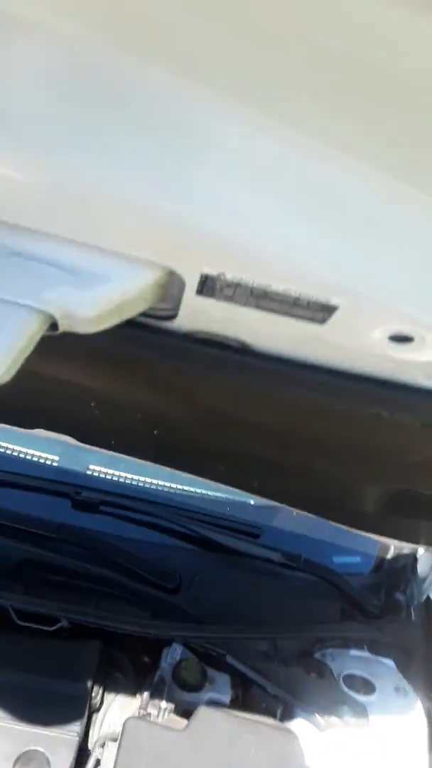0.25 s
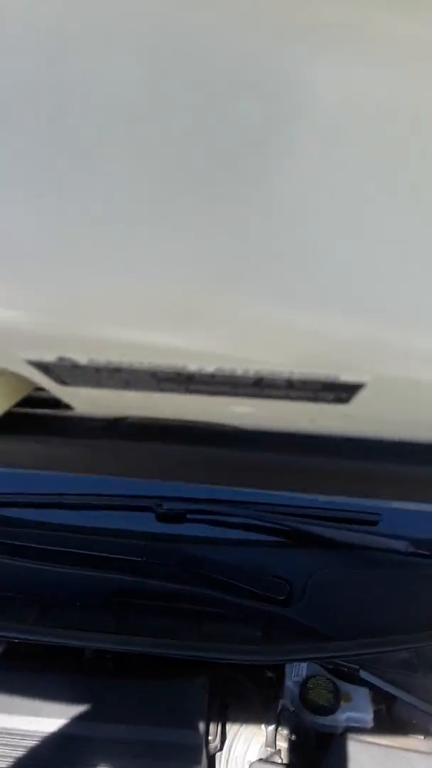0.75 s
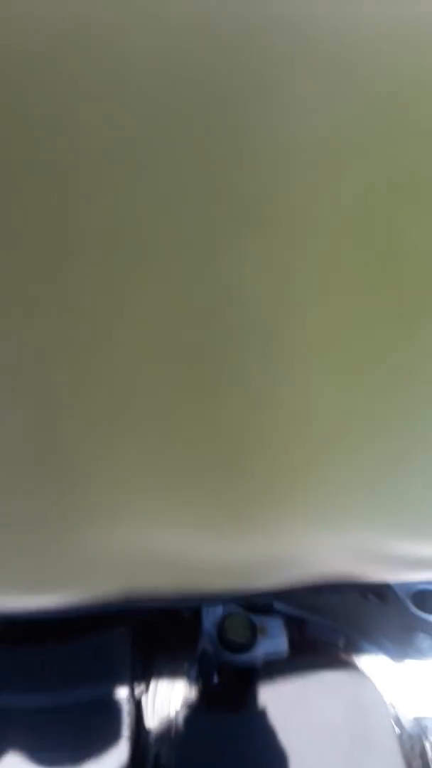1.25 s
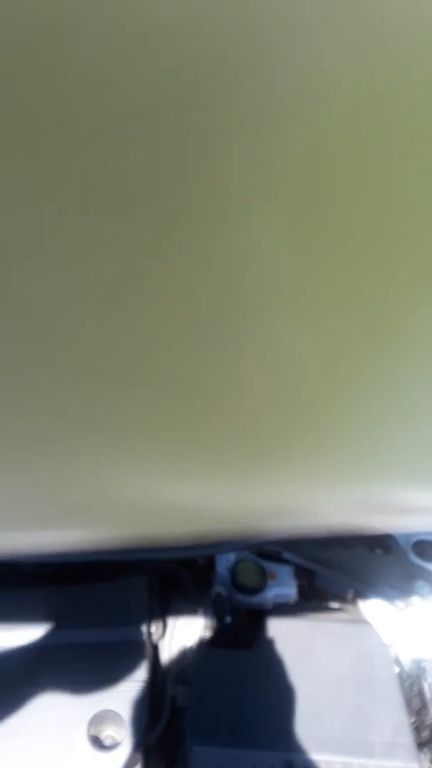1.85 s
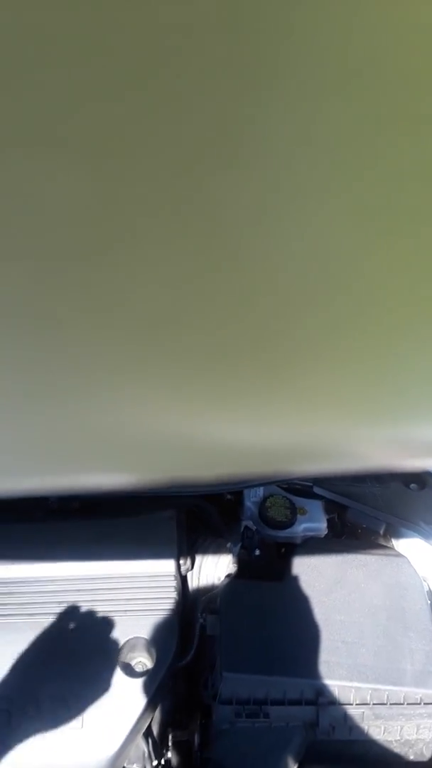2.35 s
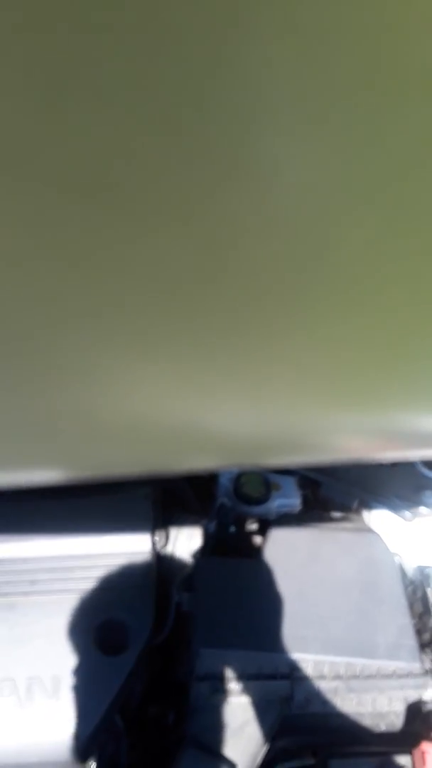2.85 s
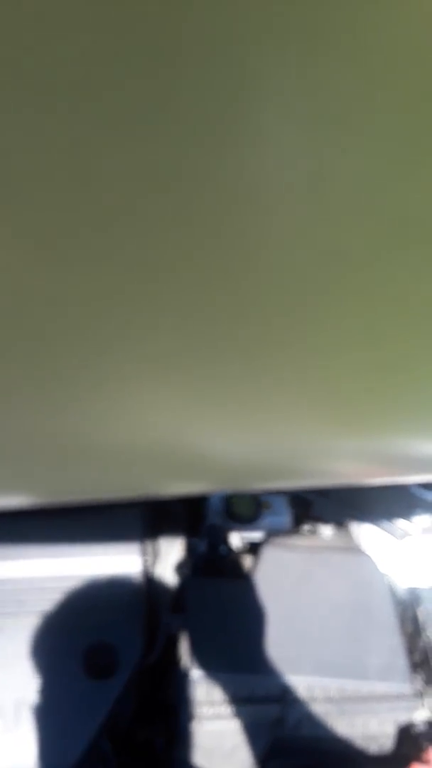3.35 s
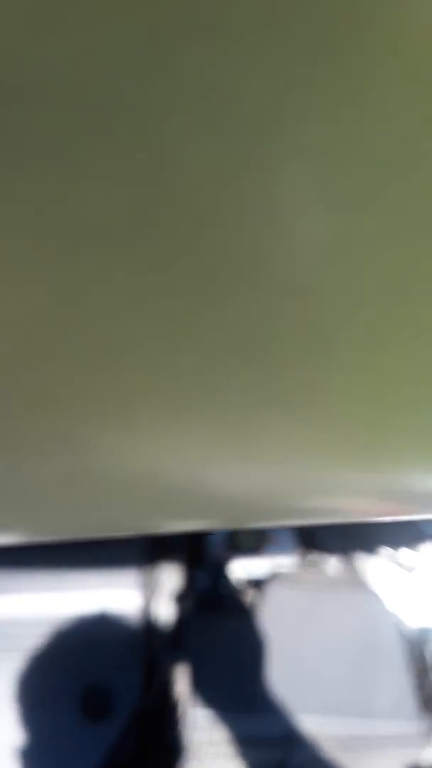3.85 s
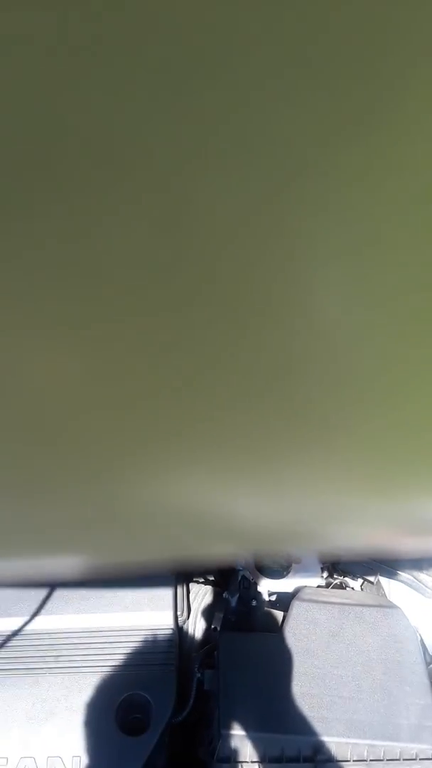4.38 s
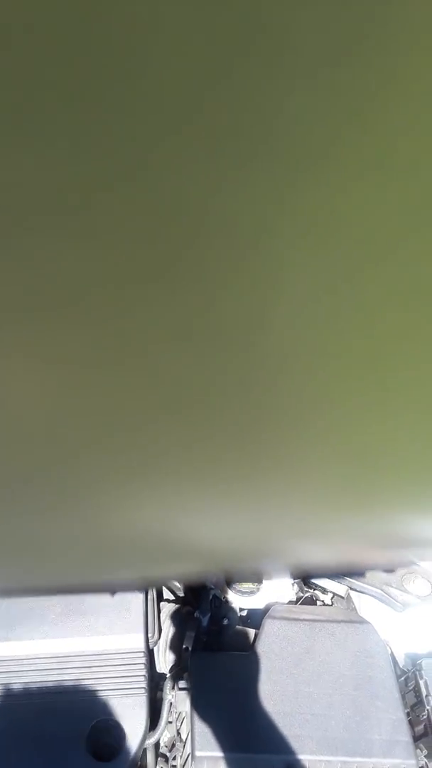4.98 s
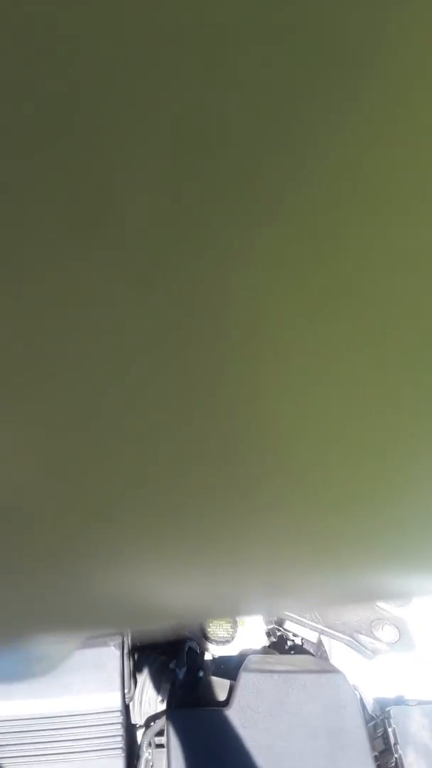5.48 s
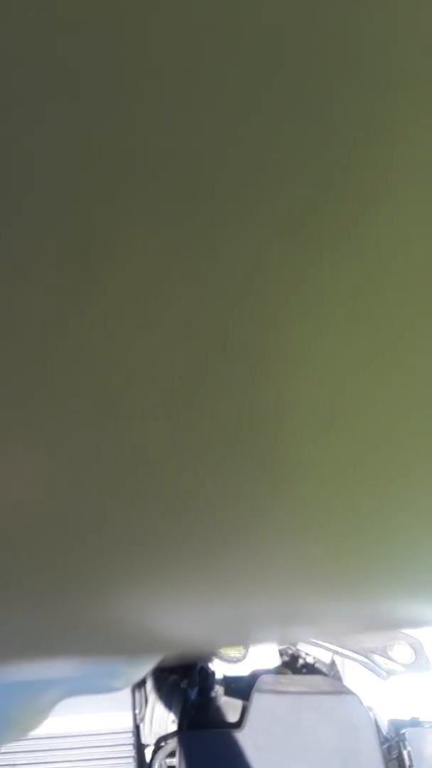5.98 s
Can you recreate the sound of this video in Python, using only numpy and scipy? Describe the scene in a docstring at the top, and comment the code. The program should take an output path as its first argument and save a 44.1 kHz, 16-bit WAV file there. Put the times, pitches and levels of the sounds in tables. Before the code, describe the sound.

A car engine idles under an open hood while a metal prop rod snaps loose, clanks and rattles into place.

```python
"""A four-cylinder engine idles: belts and fan rush, firings chuff, injectors tick, the alternator whines. A
hand bumps the phone on the right at the start, and the engine opens out as the hood lifts. At 1 s steel clanks
in a heavy blow and the hood's bending modes boom; then the whole sound sinks for a second and comes back. The
rod clanks at 3.7 s, rings and rattles into its slot at 4.5 s, and the hood settles with a few lighter knocks.
Near the end the hand bumps the phone again."""
import sys
import numpy as np
from scipy import signal
from scipy.fft import rfft, irfft, next_fast_len
from scipy.io import wavfile

SR = 44100
rng = np.random.default_rng(int(sys.argv[2]) if len(sys.argv) > 2 else 0)


def digitize_waveform(pressure):
    """Quantize a signal to 16-bit integers and store it at the path in sys.argv[1].

    Rows of a 2-D input are taken as channels; values are limited to [-1, 1].
    """
    field = np.atleast_2d(pressure).T
    bounded = np.clip(field, -1, 1)
    quanta = np.round(bounded * 32767).astype(np.int16)
    wavfile.write(sys.argv[1], SR, quanta)


N = 274302
T = np.arange(N) / SR
IMPACT_T = T[:SR // 2]  # time since a blow [s]
SIZE = next_fast_len(N, True)
HZ = np.fft.rfftfreq(SIZE, 1 / SR)
FIRING_HZ = 23.55
ANTIPHASE = np.array([[1], [-1]])


def undb(db):
    """Decibels to amplitude ratio."""
    return 10 ** (np.asarray(db) / 20)


def pan(db):
    """Stereo gains for a balance: the level difference, left minus right."""
    return undb(np.array([[.5], [-.5]]) * db)


def curves(table):
    """Linear interpolation of a time table at every sample."""
    times, *columns = np.transpose(table)
    return [np.interp(T, times, c) for c in columns]


def spectra(table):
    """Log-frequency interpolation of a table at every bin."""
    hz, *columns = np.transpose(table)
    return [np.interp(np.log(HZ + 1), np.log(hz), c) for c in columns]


def unit(x):
    """Normalisation to rms 1."""
    return x / np.sqrt(np.mean(x ** 2))


def noise(gain):
    """Spectral shaping: noise of rms 1 from a gain at each bin."""
    return irfft(rfft(rng.standard_normal(SIZE)) * unit(gain), SIZE)[:N]


def stereo_noise(gain):
    """Incoherence: the same spectrum, independent on each side."""
    return np.array([noise(gain), noise(gain)])


def walk(rate):
    """Random modulation of spread about 1, with up to rate swings a second."""
    knots = np.arange(0, T[-1] + 1, .5 / rate)
    return np.interp(T, knots, rng.standard_normal(N)[:len(knots)]) * np.sqrt(3 / 2)


def resonance(hz, width):
    """Lorentzian gain of one resonance at each bin."""
    return 1 / (1 + ((HZ - hz) / (width / 2)) ** 2)


def fade(t60):
    """Exponential damping, 60 dB down at t60."""
    return np.exp(-np.log(1000) * IMPACT_T / t60)


def excitation(hz, centre_hz, octaves):
    """Selective excitation: a blow drives the modes near its centre hardest."""
    return np.exp(-.5 * (np.log2(hz / centre_hz) / octaves) ** 2)


def add(out, at, sound):
    """Superposition of a stereo sound from a given time."""
    i = max(int(at * SR), 0)
    out[:, i:i + sound.shape[1]] += sound[:, :N - i]


def strokes(offset, rise, scatter_db):
    """Pulse train of uneven strength at the firing rate; offset and rise are shares of a cycle."""
    cycles = FIRING_HZ * T - offset + 1
    strength = undb(scatter_db * rng.uniform(-1, 1, int(FIRING_HZ * T[-1]) + 4))
    age = cycles % 1 / rise
    return unit(strength[cycles.astype(int)] * age * np.exp(-age))


# spectrum of belts and fan: (frequency [Hz], relative density [dB])
RUSH_SPECTRUM = [(25, -33), (45, -13.5), (80, -11), (170, -2), (420, -2), (720, -2.5), (1000, -8.5),
                 (1700, -14.5), (2300, -9), (2800, -19), (4400, -19.5), (5400, -27.5), (7400, -28.5),
                 (9200, -39), (11000, -33), (16000, -35)]
# the bay at the two microphone ports: (frequency [Hz], side minus mid [dB], balance [dB])
BAY_AT_PORTS = [(60, -16, 2), (250, -42, -0.5), (566, -7, 3.5), (800, -13, 10.5), (1030, 0.5, 4),
                (1440, 6.5, -1.5), (2300, -3, 0.5), (3360, 2.5, 2), (4600, 0.5, 2), (12000, 0.5, 0.5)]


def belts_and_fan(treble_db, body_flicker_db=0.56, hiss_flicker_db=0.4):
    """Broadband noise, partly coherent between the ports; the hood shades treble more than bass."""
    colour = undb(spectra(RUSH_SPECTRUM)[0])
    side_db, balance_db = spectra(BAY_AT_PORTS)
    mid, side = rfft(rng.standard_normal((2, SIZE))) * unit(colour)
    ports = (mid + side * undb(side_db) * ANTIPHASE) * pan(balance_db)
    upper = HZ ** 4 / (HZ ** 4 + 4200 ** 4)  # crossover at 4200 Hz
    body, hiss = (irfft(ports * share, SIZE)[:, :N] for share in (1 - upper, upper))
    return body * undb(body_flicker_db * walk(14)) + hiss * undb(treble_db + hiss_flicker_db * walk(33))


# air modes under the hood: (frequency [Hz], width [Hz], relative level [dB])
CAVITY_MODES = [(542, 76, -1), (617.6, 41, 0), (673.7, 32, -1)]


def firing_chuff(steady=1.25):
    """Cavity resonance: each firing rings the air under the hood, above a steady part."""
    cavity = sum(undb(db) * resonance(hz, width) for hz, width, db in CAVITY_MODES)
    return unit(noise(cavity) * (steady + strokes(offset=0.404, rise=0.11, scatter_db=2))) * pan(2.8)


def gap_ring():
    """A standing wave across the gap meets the two ports in opposite phase."""
    return noise(resonance(hz=1220, width=650)) * ANTIPHASE * pan(5.7)


def injectors():
    """Periodic impacts: one tick of high treble noise per firing."""
    return stereo_noise(resonance(hz=13900, width=11000)) * strokes(0.665, rise=0.05, scatter_db=2.5)


def valves():
    """Periodic impacts: a lower clatter at another point of the cycle."""
    return stereo_noise(resonance(hz=3150, width=2200)) * strokes(0.076, rise=0.04, scatter_db=2)


# colour of the engine through the gap: (time [s], hollow ring gain [dB], treble gain [dB])
GAP_COLOUR = [(0, -6, 0), (1, 0.5, 1.5), (2, -1, 2), (2.5, 4.5, -2.5), (2.95, -5, 2.6), (4.3, -5.5, 3.5),
              (4.7, 4.5, 2.6), (6.2, -0.5, 1.7)]


def engine(lift_s=0.4, fall_db_per_s=0.3873):
    """Acoustic shielding: the engine is muffled and lies to the right until the hood lifts."""
    lowered = np.exp(-T / lift_s)
    hollow_db, treble_db = curves(GAP_COLOUR)
    # the bay swells with the hollow ring and eases as the phone sinks below the hood's edge
    bay_db = -4 * lowered + 0.074 * hollow_db - fall_db_per_s * T
    rush = belts_and_fan(treble_db) * undb(-32)
    chuff = firing_chuff() * undb(-35 - 34 * lowered)
    hollow = gap_ring() * undb(-39 + hollow_db)
    ticking = injectors() * undb(-56.5 + treble_db) + valves() * undb(-48.5)
    return ((rush + ticking) * undb(bay_db) + chuff + hollow) * pan(-0.43 - 6.5 * lowered)


# partials of the whine: (harmonic number, relative level [dB])
WHINE_PARTIALS = [(1, -57), (2, -49), (3, -50.5), (6, -54.5), (7, -65.5), (9, -93), (10, -65), (11, -69),
                  (12, -60), (13, -65)]
# the whistling 4th harmonic, dip included: (time [s], relative level [dB], balance [dB])
WHISTLE_SWELL = [(0.0, -58, -15), (0.2, -42, -4), (0.35, -53, -5), (0.46, -42.5, -1), (0.75, -58.5, -23),
                 (0.98, -40.5, -11.5), (1.3, -62, 1), (1.6, -50.5, 10), (2.05, -62, 2), (2.6, -59.5, -8),
                 (3.1, -44, 0), (3.65, -52, 1.0), (4.15, -53.5, 8.0), (4.65, -44, -4.0), (5.02, -50.5, 7),
                 (5.25, -56, 8), (5.5, -49.0, 7), (6.2, -48, -3.0)]
# the 5th harmonic, dip included: (time [s], relative level [dB])
OVERTONE_SWELL = [(0.0, -58), (1.0, -61.5), (1.9, -74), (2.85, -54.5), (3.15, -63), (3.6, -52.5),
                  (4.9, -60), (5.8, -49.5), (6.2, -51)]


def alternator(whine_hz=1172.9, drift=0.000683, surge=0.002, flutter=0.3, fading_db=2.5):
    """Frequency modulation: a harmonic series surges with each firing and fades as the hood moves."""
    speed = 1 + drift * walk(14) + surge * np.sin(2 * np.pi * FIRING_HZ * T)
    phase = 2 * np.pi * whine_hz * np.cumsum(speed) / SR
    swell_db, pan_db = curves(WHISTLE_SWELL)
    whistles = undb(swell_db + 1) * pan(pan_db)
    overtone = undb(curves(OVERTONE_SWELL)[0] - 0.4)
    out, dipped = np.zeros((2, N)), dip()
    for port, whistle in zip(out, whistles):
        partials = [(4, whistle), (5, overtone)]
        for harmonic, db in WHINE_PARTIALS:
            partials.append((round(harmonic), dipped * undb(db - 4.5 + fading_db * walk(1.39))))
        for harmonic, gain in partials:
            stirred_air = 1 + flutter * walk(25)
            path_phase = walk(1.0)  # the path to each port changes slowly
            port += gain * stirred_air * np.sin(harmonic * phase + path_phase)
    return np.sqrt(2) * out


# bending modes of the hood, also used for the hand bumps: (frequency [Hz], relative level [dB], t60 [s])
PANEL_MODES = [(56, -27, .18), (85.2, -11, 0.27), (116.4, -1.5, 0.18), (140.7, -7, 0.19),
               (174.4, -4.5, 0.11), (224, -2.5, 0.15), (273, 1.5, 0.042), (290.6, -2.5, 0.2),
               (347, 3.5, 0.055), (411.4, -2.5, 0.097), (468, 2.5, 0.027), (529, -5, 0.14),
               (670, 6.5, 0.051), (835, 4.5, 0.059), (1030, 0, 0.066), (1366, -2.5, 0.13)]


def thump(centre_hz, push_s=0.00088, travel_s=0.0018, spread=0.74):
    """Modal vibration: a soft shove rings the low modes, a hard knock the high ones."""
    hz, db, t60 = np.transpose(PANEL_MODES)[:, :, None]
    weight = undb(db) * excitation(hz, centre_hz, octaves=0.66)
    # each bending wave takes its own path; short ones reach the two ports out of step
    lag = travel_s * rng.uniform(-1.156, 1, (len(hz), 1))
    skew = spread * hz / 700 * rng.standard_normal((2, len(hz), 1))
    modes = weight * fade(t60) * np.sin(2 * np.pi * hz * (IMPACT_T - lag) + skew)
    return -modes.sum(axis=1) * (1 - np.exp(-IMPACT_T / push_s))


# knocks on the hood and, in the first three rows and the last, bumps of a hand on the phone:
# (time [s], level [dB], strike centre [Hz], heave delay [s], heave centre [Hz], balance [dB])
KNOCKS_AND_BUMPS = [(.001, -19.5, 197, .013, 124, -24), (.044, -25, 270, .014, 201, -19),
                    (0.06, -28, 447, 0.013, 150, -10), (1.051, -11.5, 194, 0.021, 222, 7),
                    (3.728, -16.5, 616, .01, 380, 4), (4.517, -16.5, 300, .012, 119, 5),
                    (4.604, -24, 554, 0.0173, 79.4, 5.5), (4.774, -30, 1050, .034, 132, 1.5),
                    (5.1129, -23.5, 900, .015, 233, 8), (5.76, -36, 80, .02, 89.4, -22)]


def knocks_and_bumps():
    """Impact response: a strike, a heave further to the right, then one weak rebound."""
    out = np.zeros((2, N))
    for at, db, strike_hz, delay, heave_hz, pan_db in KNOCKS_AND_BUMPS:
        add(out, at, thump(strike_hz) * undb(db) * pan(pan_db))
        add(out, at + delay, thump(heave_hz) * undb(db + 1.5) * pan(pan_db - 4.5))
        add(out, at + 2.8 * delay, thump(heave_hz) * undb(db - 12.5) * pan(pan_db))
    return out


# spectrum of a steel contact: (frequency [Hz], relative density [dB])
CLICK_SPECTRUM = [(300, -33), (1500, -13.5), (4000, 5.5), (6700, 5), (9000, -16), (10500, 3), (16000, -26)]


def click(t60=0.0065):
    """Contact transient: steel meets steel so briefly that the sound is broadband."""
    return stereo_noise(undb(spectra(CLICK_SPECTRUM)[0]))[:, :len(IMPACT_T)] * fade(t60)


# modes of hinge and prop rod: (frequency [Hz], relative level [dB], t60 [s])
STEEL_MODES = [(1340, 4, 0.014), (1548, 0, 0.055), (1890, -6, 0.038), (2275, 2.5, 0.033),
               (2350, -49, 0.032), (2750, 0, 0.031), (3260, 0.5, 0.017), (3750, -4.5, 0.017),
               (4340, -11, 0.022), (4380, 0, 0.014)]


def steel_ring(centre_hz):
    """Free vibration: struck steel rings in damped, inharmonic modes."""
    hz, db, t60 = np.transpose(STEEL_MODES)[:, :, None]
    weight = undb(db) * excitation(hz, centre_hz, octaves=0.99)
    phase = rng.uniform(0, 2 * np.pi, (2, len(hz), 1))
    return (weight * fade(t60) * np.sin(2 * np.pi * hz * IMPACT_T + phase)).sum(axis=1)


# light contacts of hinge and rod: (time [s], level [dB], balance [dB])
STEEL_TICKS = [(.7849, -30, -21), (1.0638, -19, 2), (1.0717, -21, 14), (1.162, -27, 3), (1.545, -29, -8),
               (2.186, -28, 4), (4.578, -28, 9)]


def steel_ticks():
    """Weak excitation: a light contact clicks and barely rings the steel."""
    out = np.zeros((2, N))
    for at, db, pan_db in STEEL_TICKS:
        tick = click() + undb(-16) * steel_ring(centre_hz=3000)
        add(out, at, tick * undb(db) * pan(pan_db))
    return out


# spectrum of the loose rattle: (frequency [Hz], relative density [dB])
RATTLE_SPECTRUM = [(100, -8), (500, 4.5), (1100, -3.5), (1800, -7), (2500, -0.5), (3400, -9), (4400, -15),
                   (5600, -20.5), (7200, -19), (9500, -32), (16000, -22)]


def rattle(t60):
    """Exponential decay: a noisy rattle dies away in the engine bay."""
    return stereo_noise(undb(spectra(RATTLE_SPECTRUM)[0]))[:, :len(IMPACT_T)] * fade(t60)


# clanks of the prop rod: (time [s], click level [dB], ring level [dB], ring centre [Hz],
# rattle level [dB], rattle t60 [s], balance of ring and rattle [dB])
ROD_CLANKS = [(1.0508, -14.5, -17.5, 1700, -26, 0.13, 11), (3.7289, -20.5, -28, 2200, -15, .11, 0),
              (4.517, -21, -13.5, 3130, -22, 0.65, 1), (4.556, -36, -31, 2600, -41, 0.11, 7)]


def prop_rod(seat_s=0.0015):
    """Impact excitation: the rod clicks on the left as it touches, then rings and rattles as it seats."""
    out = np.zeros((2, N))
    for at, click_db, ring_db, ring_hz, rattle_db, rattle_t60, pan_db in ROD_CLANKS:
        add(out, at, undb(click_db) * click() * pan(9.5))
        seated = undb(ring_db) * steel_ring(ring_hz) + undb(rattle_db) * rattle(rattle_t60)
        add(out, at + seat_s, seated * pan(pan_db))
    return out


def dip(start_s=1.103, hold_s=1.062, depth_db=-11.5, fall_s=0.12, return_s=0.068):
    """Exponential relaxation: the level sinks after the heaviest blow, stays down and comes back."""
    down = 1 - np.exp(-np.maximum(T - start_s, 0) / fall_s)
    held = np.exp(-np.maximum(T - start_s - hold_s, 0) / return_s)
    return undb(depth_db * down * held)


def scene():
    """Superposition of engine, thumps and steel; the alternator carries the dip within it."""
    return (engine() + knocks_and_bumps() + steel_ticks() + prop_rod()) * dip() + alternator()


def record(dry, low_hz=55, top_hz=15900):
    """Band limiting and saturation: the phone drops deep bass, clips at full scale and cuts the top."""
    highpass = signal.butter(2, low_hz, "highpass", fs=SR, output="sos")
    lowpass = signal.ellip(10, .2, 80, top_hz, fs=SR, output="sos")
    clipped = np.clip(signal.sosfilt(highpass, dry), -1, 1)
    return signal.sosfilt(lowpass, clipped)


dry = scene()
out = record(dry)
digitize_waveform(out)
```